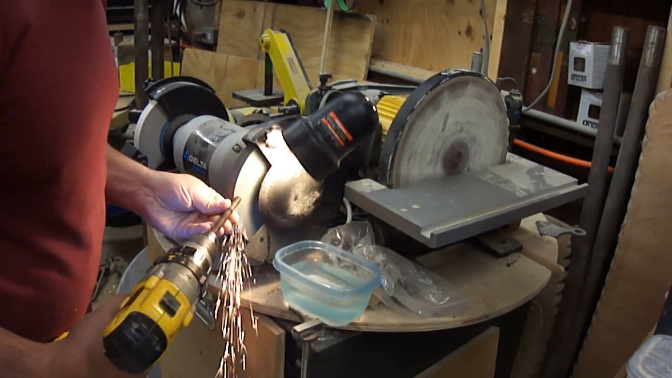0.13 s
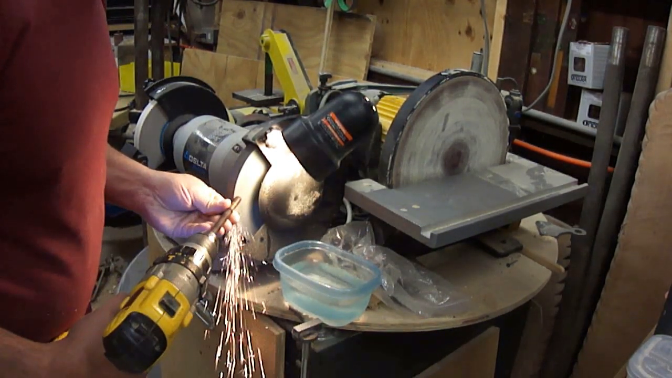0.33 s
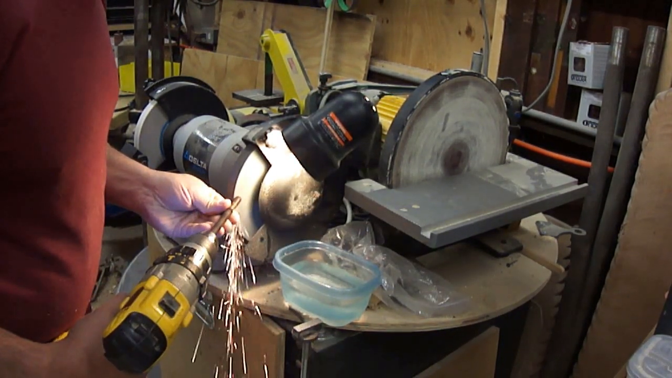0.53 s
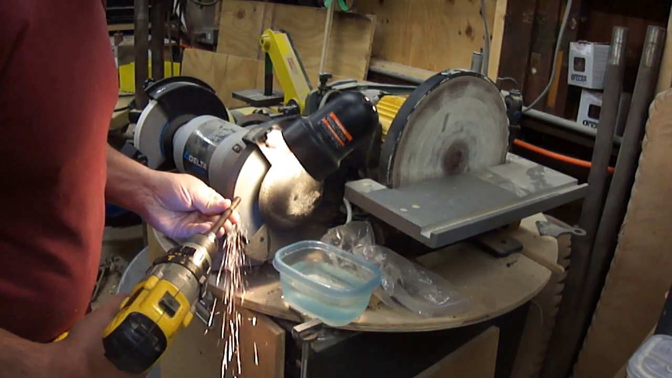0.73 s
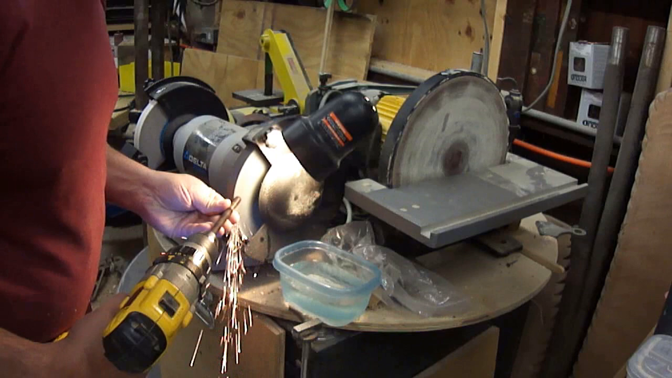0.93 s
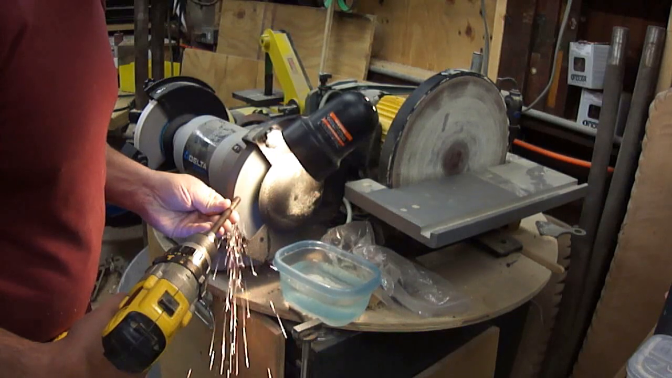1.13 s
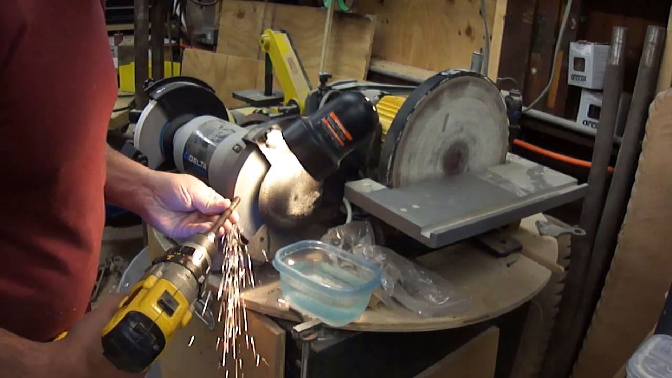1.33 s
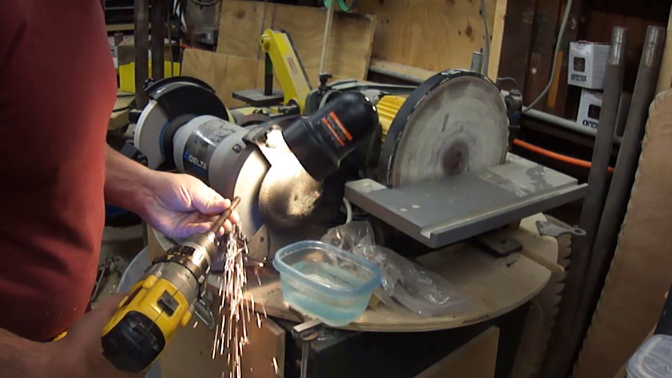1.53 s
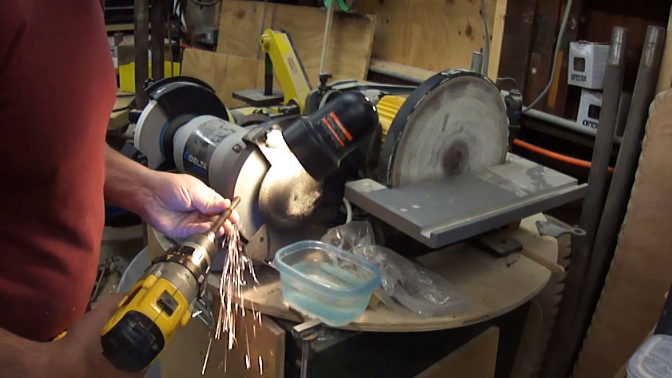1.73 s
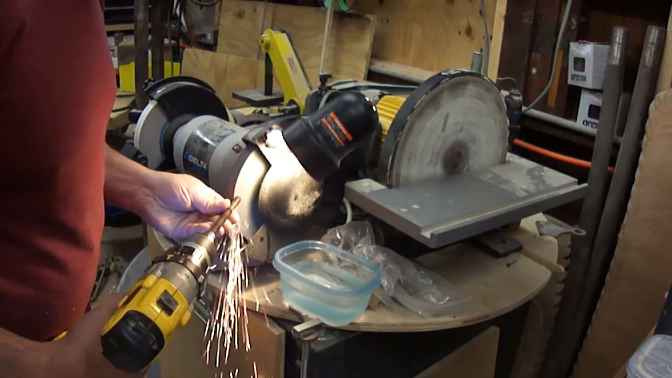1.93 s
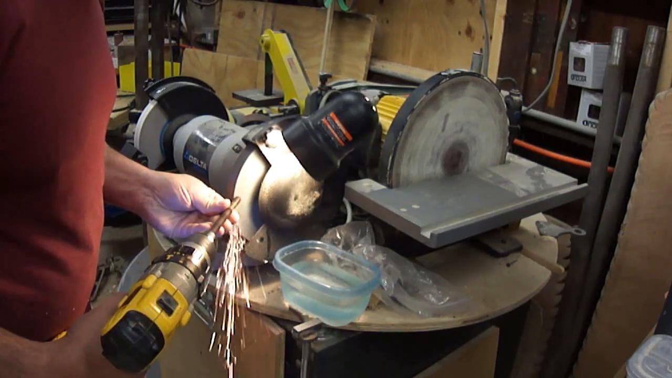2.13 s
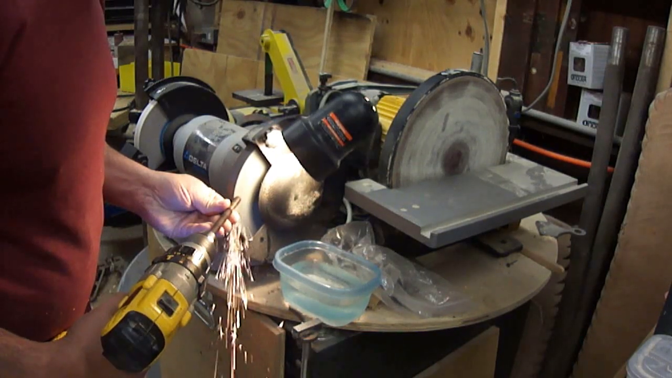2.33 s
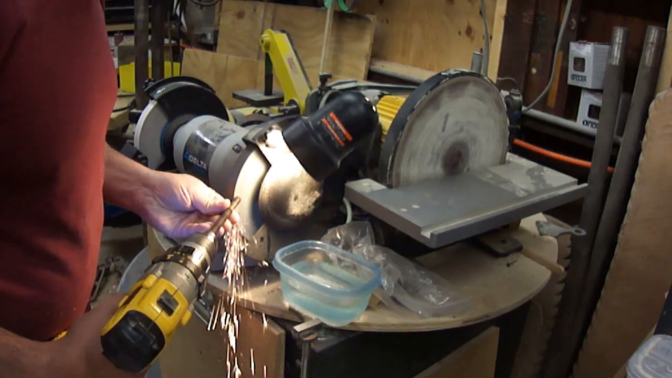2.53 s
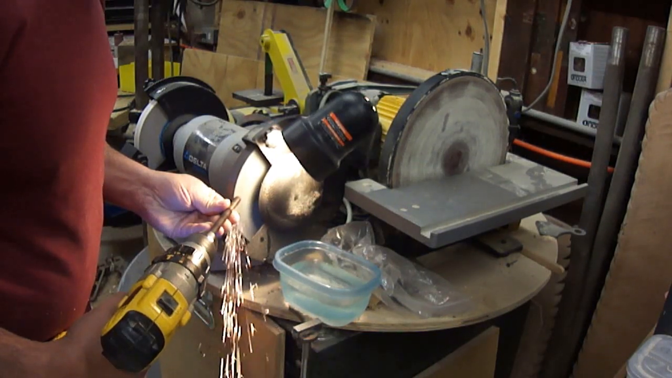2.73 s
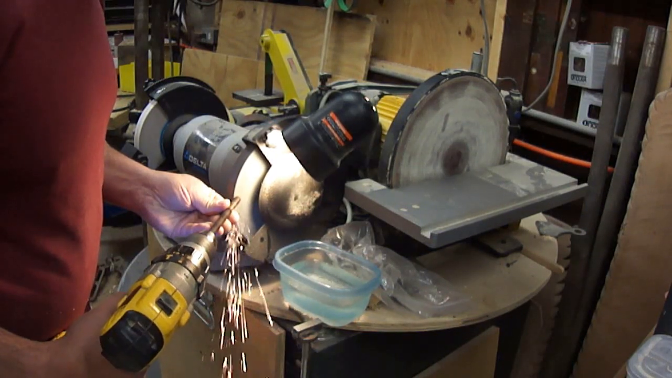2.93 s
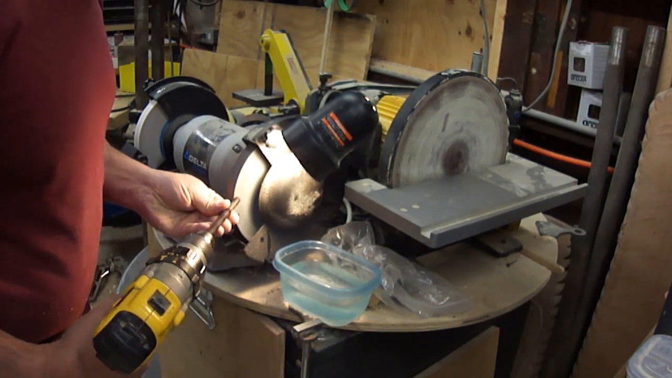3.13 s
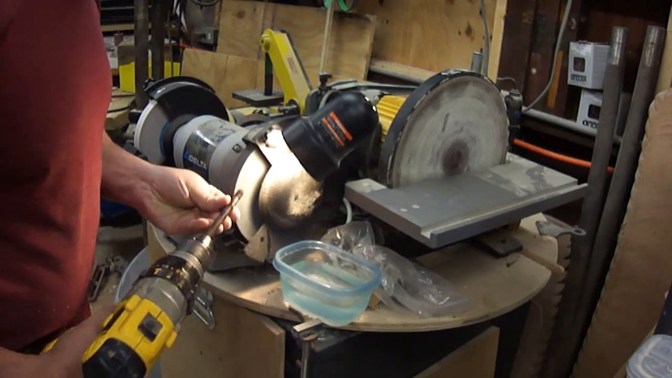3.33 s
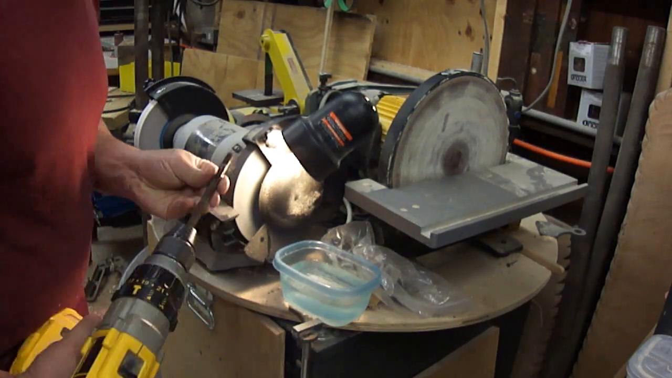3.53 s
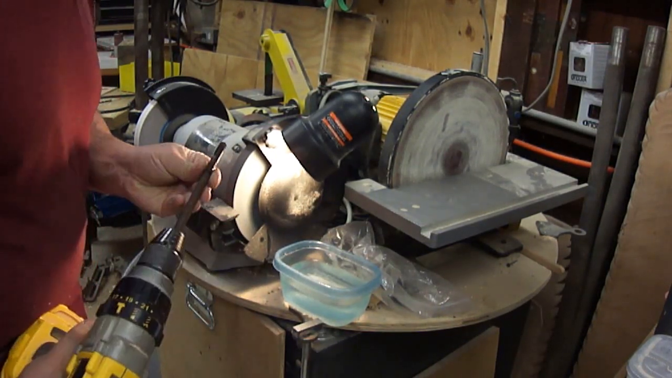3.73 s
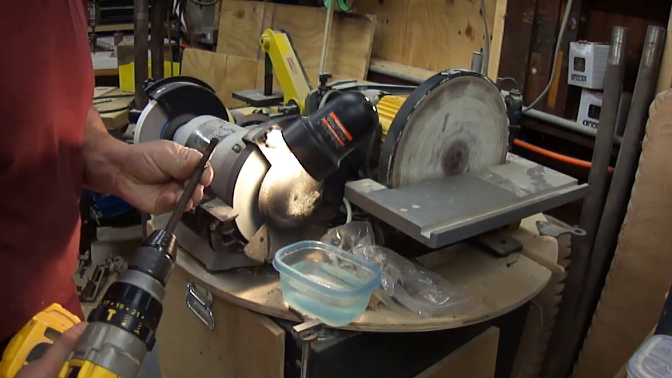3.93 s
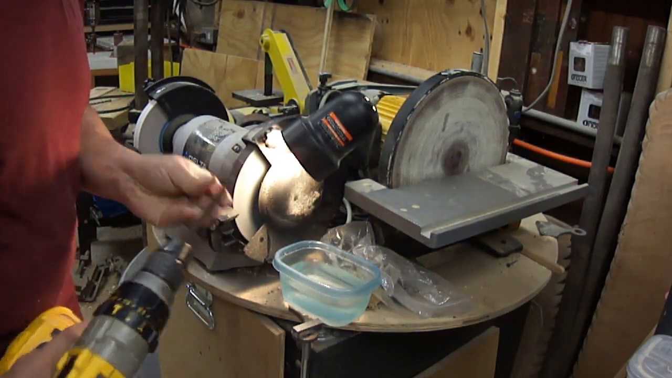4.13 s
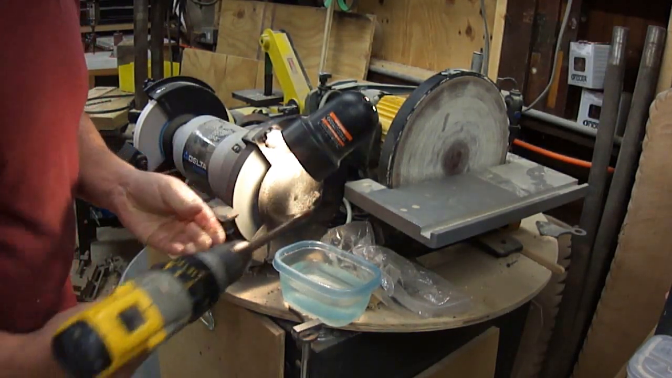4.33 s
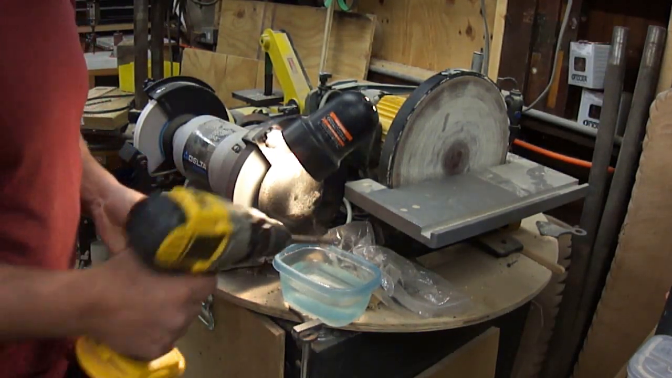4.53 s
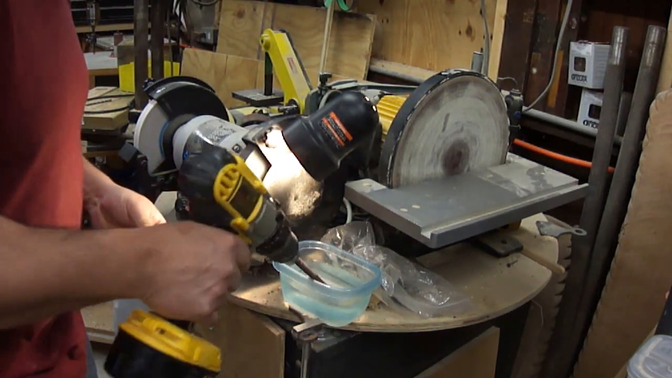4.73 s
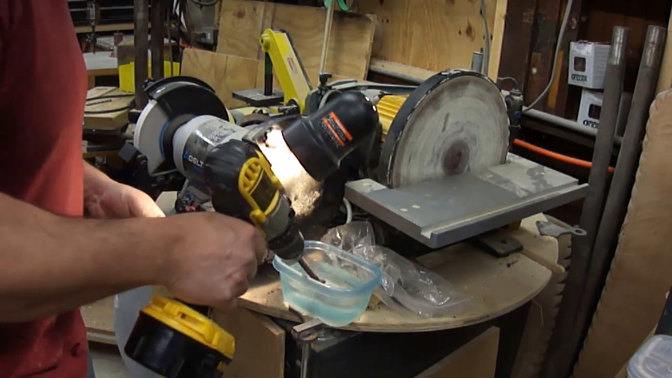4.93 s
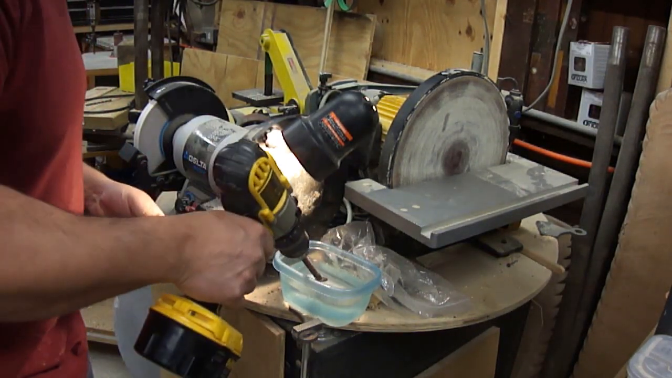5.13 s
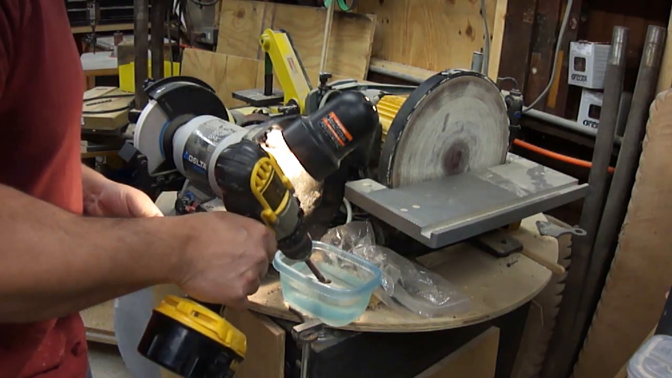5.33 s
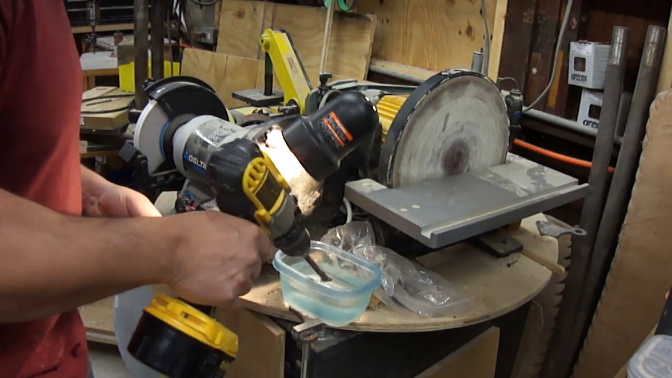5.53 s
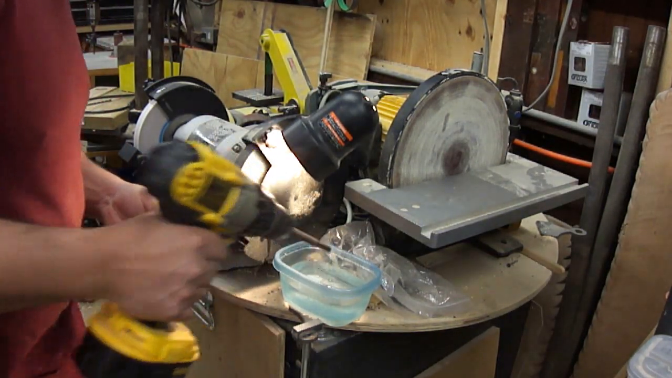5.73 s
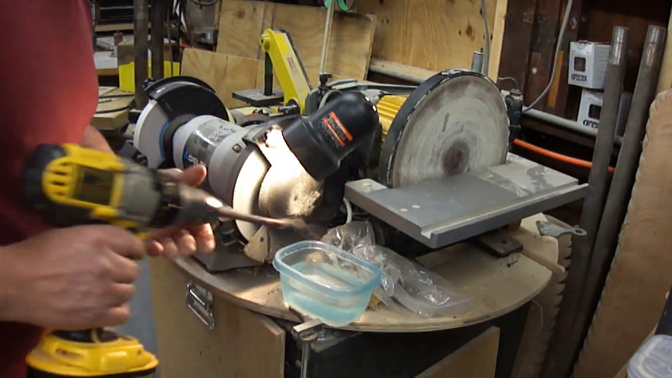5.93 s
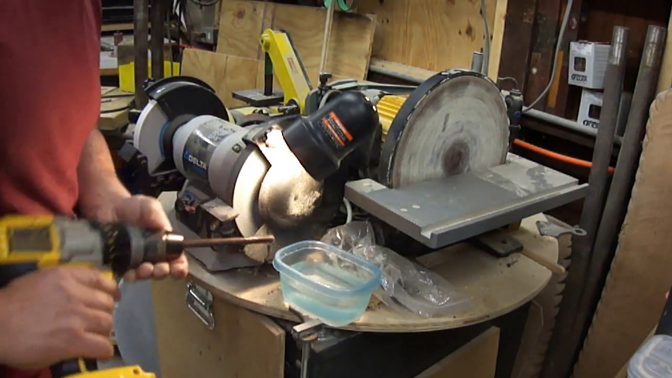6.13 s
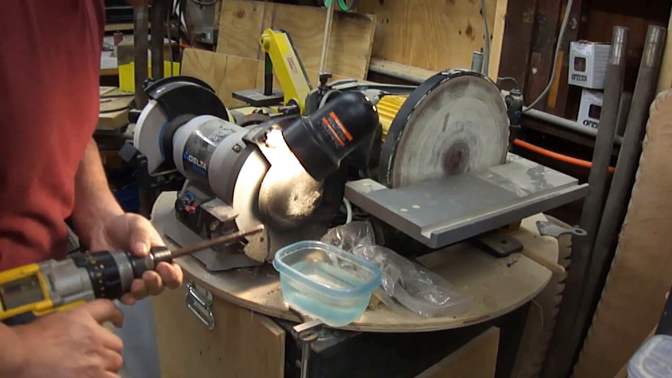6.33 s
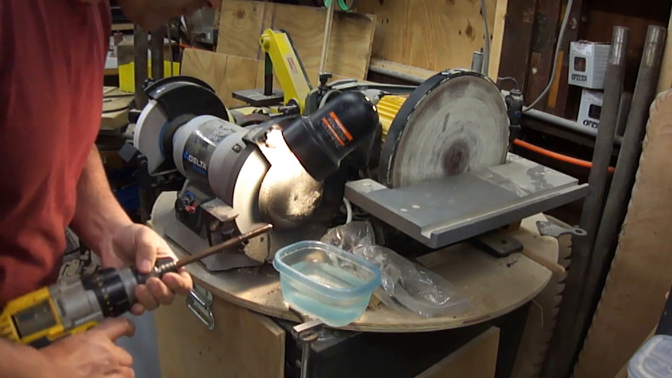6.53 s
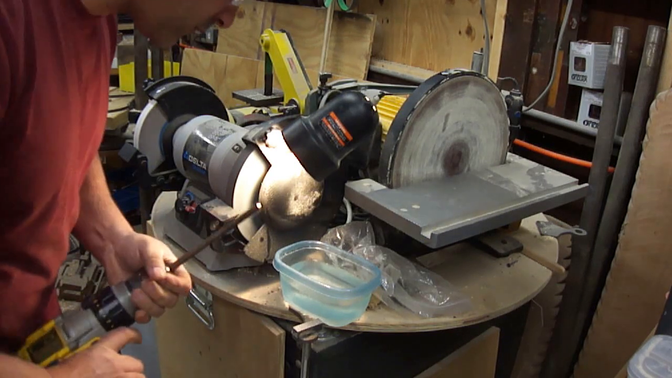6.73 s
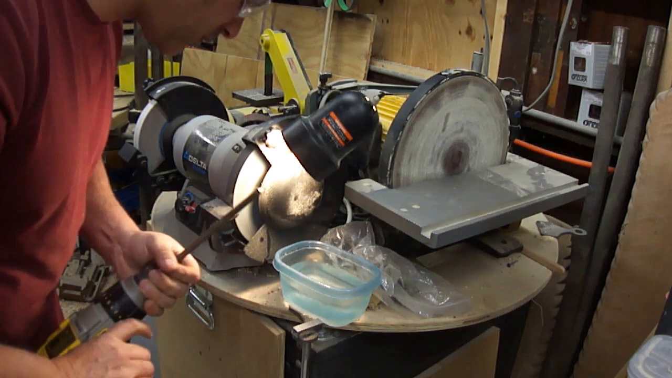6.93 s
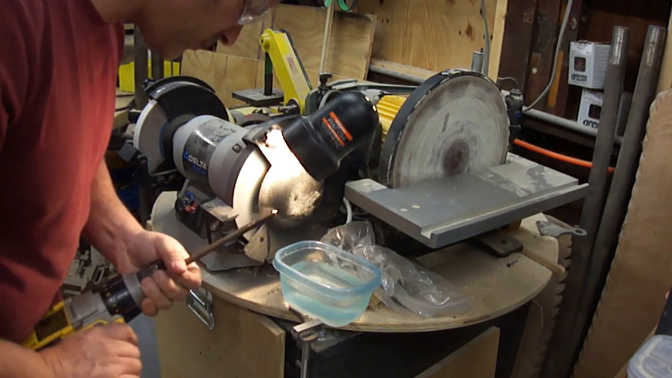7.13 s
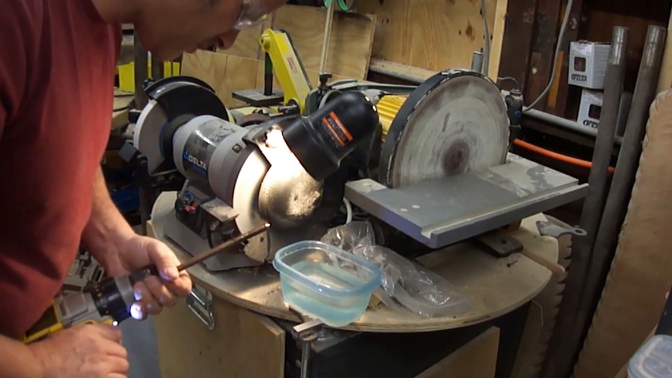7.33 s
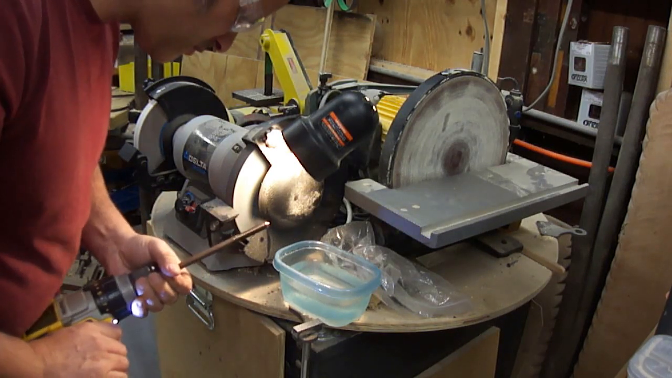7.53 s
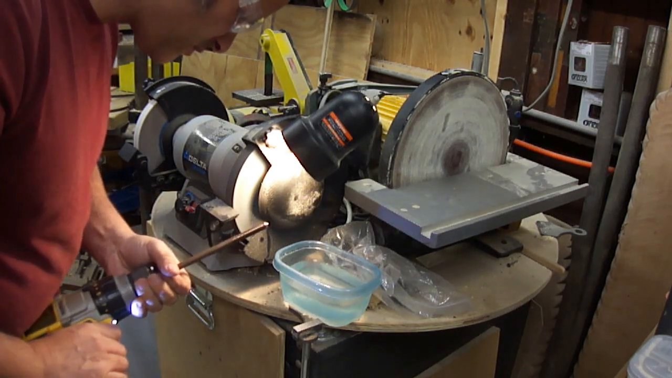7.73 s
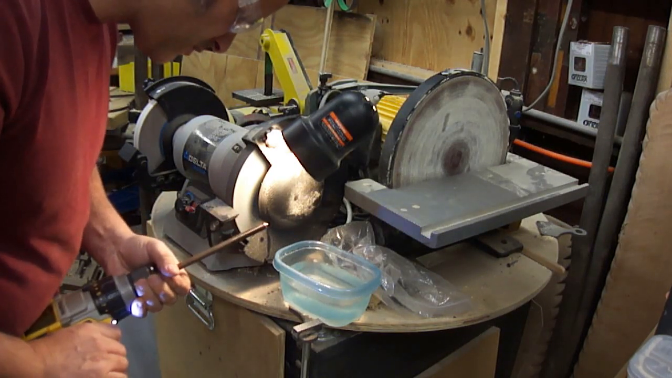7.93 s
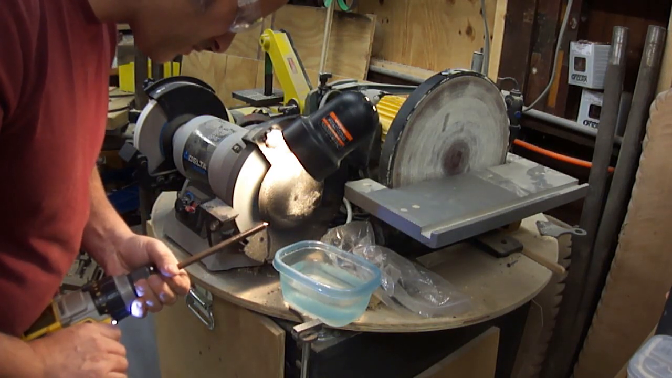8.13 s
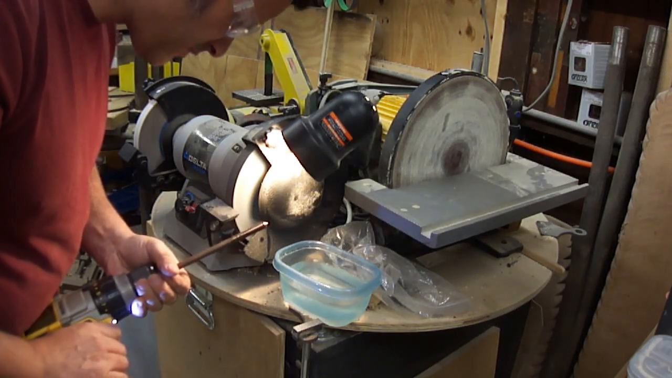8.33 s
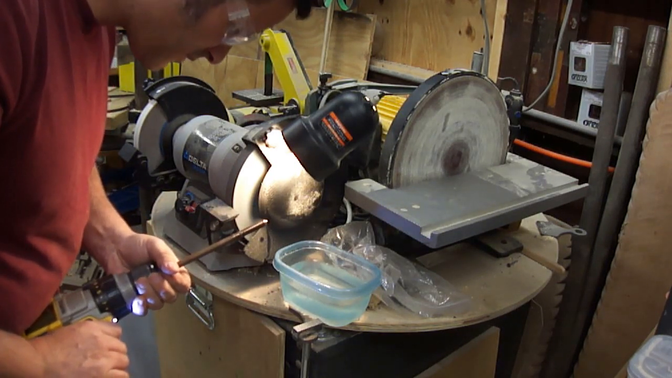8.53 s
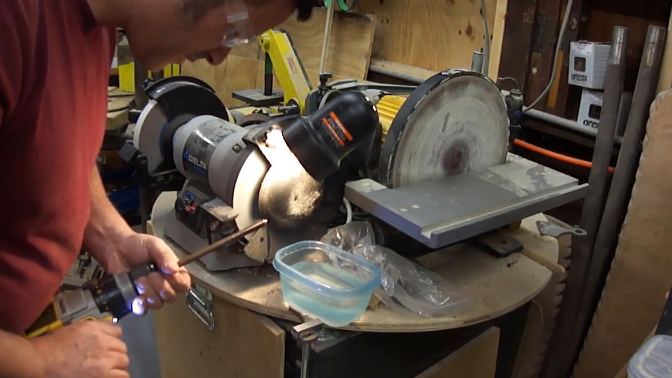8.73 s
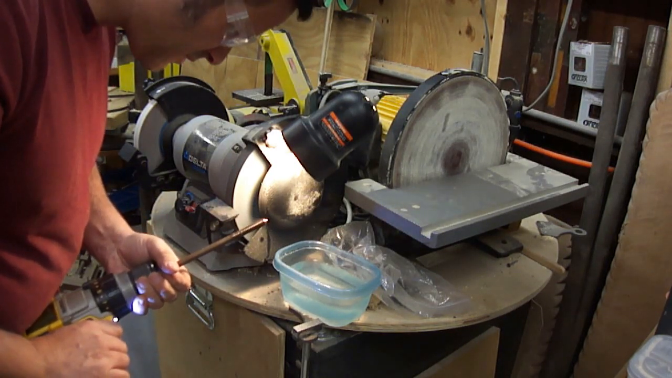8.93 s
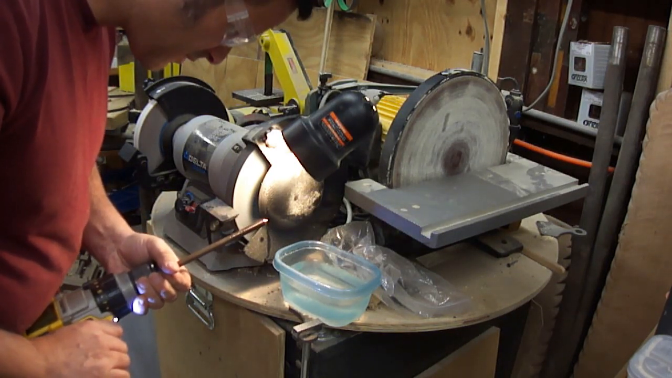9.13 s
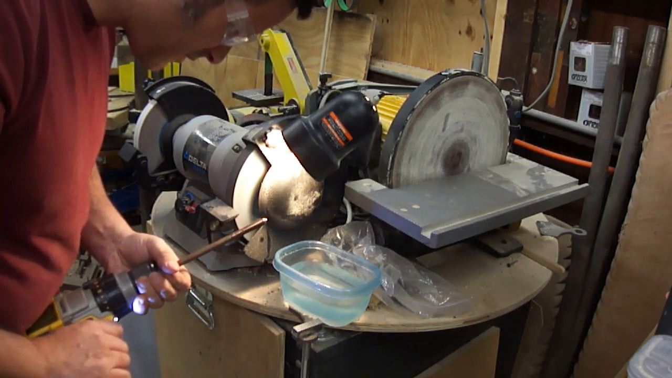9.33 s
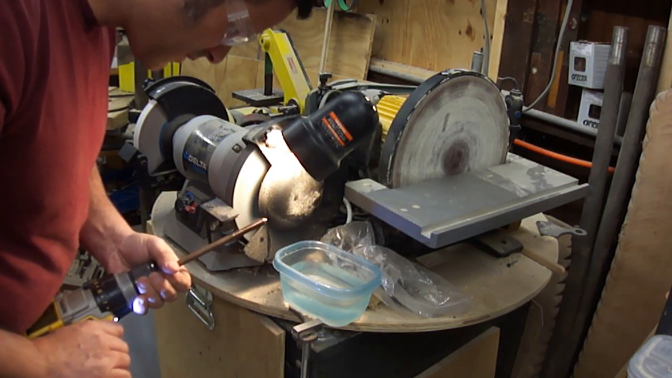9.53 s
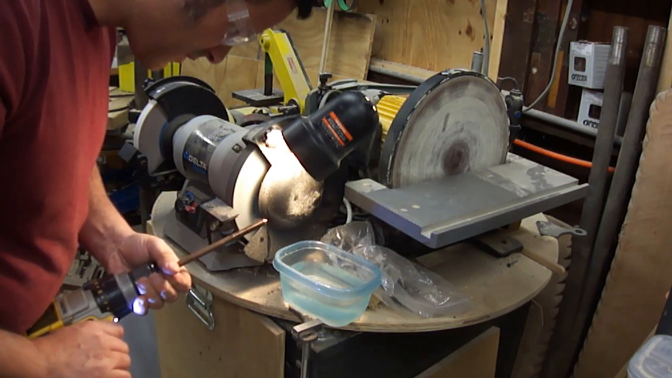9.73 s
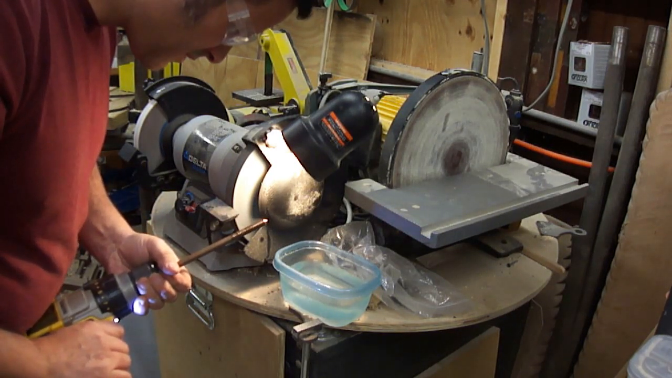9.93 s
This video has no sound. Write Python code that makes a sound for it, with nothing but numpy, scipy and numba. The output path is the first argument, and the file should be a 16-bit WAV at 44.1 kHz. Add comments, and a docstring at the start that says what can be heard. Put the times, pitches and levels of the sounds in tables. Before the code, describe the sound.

A steel rod grinds against a bench grinder wheel with a harsh rasp and a piercing, throbbing squeal over a thin drill whine. After about three seconds it lifts off, leaving the grinder running with rushing air, hum and rattling bearings. Later a cordless drill clicks on, whines up to full speed with a squealing bearing, then starts coasting down. The sound is close, in a small workshop with little echo.

```python
"""A rasp and a piercing squeal: a steel rod, turned slowly by a cordless drill, bites into a bench grinder.
Grit tears at the steel and the squeal throbs with each turn of the wheel. After three seconds the rod
lifts off and the grinder runs free in the small workshop, all rushing air and rattling bearings.
Later the drill clicks on, whines up to full speed with a squealing bearing, and is let go.
An automatic gain control holds the loud parts down and slowly swells in between."""
import sys
import numpy as np
from scipy import signal
from scipy.fft import rfft, irfft, next_fast_len
from scipy.io import wavfile
from scipy.ndimage import uniform_filter1d
from numba import njit

SR = 44100
rng = np.random.default_rng(int(sys.argv[2]) if len(sys.argv) > 2 else 0)


def generate_wav(signal):
    """Clip the signal to [-1, 1] and save it as 16-bit WAV at the path in sys.argv[1]."""
    frames = np.transpose(np.atleast_2d(signal))
    scaled = np.clip(frames, -1, 1) * 32767
    pcm = np.round(scaled).astype(np.int16)
    wavfile.write(sys.argv[1], SR, pcm)


N = 439677
TIME = np.arange(N) / SR
FFT_SIZE = next_fast_len(N + SR // 2)
FREQ = np.maximum(np.arange(FFT_SIZE // 2 + 1) * SR / FFT_SIZE, 1)

# Levels in the tables are relative; each layer gets its place in the mix below.
# grinder shaft, slower under load: time_s, speed_hz
SHAFT_SPEED = [(0, 49.42), (3.14, 49.42), (3.5, 50.8), (4, 50.92), (10, 50.86)]
# the shaft's drone: shaft_multiple, level_db
DRONE_TONES = [(1, -38), (2, -26), (3, -25.5), (4, -17.5), (5, -6), (6, -10.5), (8, -2.5), (10, -2.5),
               (11, -4), (17, 2), (19, -10), (21, -10), (22, -8), (24, -10), (26, -8.5), (27, -5), (44, -7),
               (63, -2), (64, -6)]
# single drone overtones that swell and sink: shaft_multiple, middle_s, half_length_s, lift_db
DRONE_SWELLS = [(19, 5, 1.7, 8), (5, 5.8, .65, 6), (27, 5.9, .17, 7), (8, 7, .8, 5), (44, 7.36, .075, 14)]
# motor hum at multiples of the mains: pitch_hz, level_db
MAINS_HUM = [(480, -46), (600, -32.5)]
# air rushing round the wheels: frequency_hz, level_db
AIR_SPECTRUM = [(30, -44), (80, -38), (160, -26.5), (215, -7.5), (300, -1), (480, 5), (760, 0.5),
                (1150, 1.5), (1600, -5), (2300, 0), (4700, -4.5), (7000, -8.5), (10500, -22.5),
                (15000, -95)]
# rise and fall of that rush: time_s, level_db
AIR_FADER = [(3.1, -3.5), (3.6, -0.7), (5.2, -1), (5.75, 1), (6.2, 0.8), (6.9, -0.8), (9.9, -0.5)]
# boom of the housing and guards: pitch_hz, width_hz, level_db
HOUSING_MODES = [(483, 59, -4.5), (607.5, 22, -2), (870, 41, 1.5), (1045, 48, -12), (1327, 53, -13.5)]
# midrange roar that opens up for a moment: pitch_hz, width_hz, level_db
ROAR_MODES = [(305, 100, -3), (660, 150, -6), (1060, 82, 1), (1290, 100, 1), (1680, 290, -10)]
# metal parts rung by the grinder's bearings: pitch_hz, width_hz, level_db
RATTLE_MODES = [(1985, 70, -10), (2110, 60, -4), (2682, 27, -6), (3050, 50, -7), (3220, 100, 5.5),
                (3372, 55, 5), (3875, 40, -7), (4110, 83, -0.5), (4250, 50, -6), (4490, 60, -10),
                (5230, 160, -9.5), (5800, 45, -6), (6780, 86, -15), (7230, 68, -16)]
# the worker moves about and shields the grinder: time_s, body_db, rattle_db, drone_db
SHIELDING = [(3.5, 4, 2, 2), (4.2, 2.5, 3, 2), (5.1, 1.2, 2, 1), (5.9, -1, -2, .5), (6.6, -2, -1, -1.5),
             (7.3, -1.5, 2.8, -1), (8.2, -1, 0.5, -0.5), (9.2, -1.5, 0.5, -1.5), (9.9, -1.5, 0, -.5)]
# the drill's fan tone: fan_multiple, level_db
FAN_TONES = [(1, -0.5), (2, -17.5)]
# how strongly the fan tone carries at each pitch: pitch_hz, level_db
FAN_RESONANCE = [(400, -62), (640, -35), (770, -22.5), (830, -20.5), (865, -14.5), (900, -10.5),
                 (945, -18.5), (1000, -19), (1020, -20), (1037, -15.5), (1045, -13.5), (1047, -12.5)]
# gearbox whirr: frequency_hz, level_db
WHIRR_SPECTRUM = [(150, -41), (400, -9), (800, -1.5), (1300, -2), (1700, -1.5), (2400, 3.5), (3100, -6.5),
                  (3700, 4.5), (4300, 3), (4900, -0.5), (5900, 0), (7500, -11.5), (10500, -11.5),
                  (15000, -93)]
# whine of meshing teeth: fan_multiple, level_db
MESH_TONES = [(3, -23), (5, -25), (6, -21), (7, -18.5), (8, -23), (9, -27), (10, -29)]
# the drill's bearing squeals: start_s, length_s, pitch_hz, scoop_hz, sag_hz, level_db, jitter_share
BEARING_BURSTS = [(7.53, .105, 4720, 200, 180, -21, .004), (7.78, 0.065, 4160, 60, 20, -17, 0.012),
                  (7.85, 0.23, 4450, 368, 50, -21, 0.002), (8.15, 0.41, 4290, -70, 0, -23.5, .0022),
                  (8.583, 0.6, 4395, 20, 20, -25, 0.003)]
# the rod's last catch on the wheel, then the drill switch's snap, rattle and seating:
# start_s, peak_db, centre_hz, width_hz, decay_s
KNOCKS = [(3.1413, 16, 4600, 4500, .0012), (3.145, 3, 3800, 3000, .012), (7.4324, 3, 3400, 2200, .0007),
          (7.4334, -8, 7000, 9000, .002), (7.439, -7, 3800, 1200, .003)]
# the drill's speed controller sings at part trigger: pitch_hz, level_db
CONTROLLER_TONES = [(1946, -19.5), (3892, -21), (7784, -23.5)]
# grit tearing at steel: frequency_hz, level_db
RASP_SPECTRUM = [(30, -66), (100, -44), (250, -17.5), (400, -9.5), (560, 2), (850, -9), (1150, 1.5),
                 (1600, -2), (2400, 4.5), (3200, 0.5), (4500, 1.5), (5400, -1.5), (6700, -1), (7500, -6.5),
                 (8600, -6.5), (10500, -10), (15000, -7.5)]
# the uneven wheel shakes the rod: shaft_multiple, level_db
CHATTER_TONES = [(1, -52), (2, -31), (3, -29.5), (8, -8.5), (10, 0), (11, -6), (12, -1.5), (13, -6),
                 (23, -6), (29, -4.5), (36, -5.5), (44, -4)]
# loose ringing of the rod, struck by grit: pitch_hz, width_hz, level_db
STRUCK_MODES = [(2775, 45, -9), (5630, 44, 2), (5800, 40, -12), (9210, 65, -8), (9540, 120, -7.5)]
# four rod squeals locked to the wheel (two lone tones, the main tone with sidebands, a high pair),
# one list each: shaft_multiple, level_db
ROD_SQUEAL_TONES = [
    [(55, 0)],
    [(59, 0)],
    [(112, -17), (113, -10), (114, 0), (115, -11), (116, -16), (118, -7.5)],
    [(186, 0), (193, -10)],
]
# roughness of each rod squeal: throb_db, flutter_db, skate_turns
ROD_SQUEAL_ROUGHNESS = [(2, 1.5, .0007), (1, 1, .0005), (.5, 1.5, .0005), (2, 2, .0005)]
# their balance as the rod's bite shifts: time_s, lowest_db, second_db, main_db, high_pair_db
ROD_SQUEAL_FADERS = [(0, -15.5, -10, -8, -19), (.12, -17.5, -17, -10, -18), (.24, -8, -12, -4.5, -22),
                     (.42, -16, -15, -2.5, -23), (.64, -15.5, -16, -1.5, -14),
                     (.85, -15, -16.5, -4.5, -12.5), (1.3, -15, -18, -5.5, -15),
                     (1.7, -11, -9.5, -9, -13.5), (1.85, -12, -10.5, -5, -15), (2, -13.5, -13.5, -9, -17),
                     (2.15, -17.5, -9.5, -4, -16), (2.5, -12, -7.5, -2.5, -20), (2.8, -14, -9, -5.5, -19),
                     (3, -15, -15, -7, -18)]

EASE_OFF_S, LIFT_OFF_S = 3.1, 3.14  # the hand lets up, then the rod leaves the wheel
TRIGGER_S, LET_GO_S = 7.435, 9.24  # the drill's free run


def undb(db):
    """Decibels to gain."""
    return 10 ** (np.asarray(db) / 20)


def unit(x):
    """Scale to rms 1."""
    return x / np.sqrt(np.mean(x ** 2))


def curves(table):
    """Each column of a timed table as a sample-by-sample curve."""
    times, *columns = np.transpose(table)
    return [np.interp(TIME, times, column) for column in columns]


def since(start_s):
    """Seconds gone by since a moment, zero before it."""
    return np.maximum(TIME - start_s, 0)


def fade(end_s, decay_s):
    """Full level until a moment, then dying away."""
    return np.exp(-since(end_s) / decay_s)


def swell(middle_s, half_s):
    """A smooth, flat-topped swell from 0 to 1 and back."""
    return np.exp(-((TIME - middle_s) / half_s) ** 4)


def noise():
    """White noise."""
    return rng.standard_normal(N)


def wander(rate_hz):
    """Smooth random drift with a spread near 1."""
    hold = max(int(SR / rate_hz), 1)
    return 1.19 * uniform_filter1d(np.repeat(noise()[:N // hold + 1], hold), hold)[:N]


def colour(x, spectrum):
    """Equalise a sound along a spectrum, at rms 1."""
    hz, db = np.transpose(spectrum)
    response = undb(np.interp(np.log(FREQ), np.log(hz), db))
    return unit(irfft(rfft(x, FFT_SIZE) * response, FFT_SIZE)[:N])


def resonate(x, modes, bass_hz=210):
    """Ring a set of resonances, at rms 1; small parts radiate little bass."""
    response = sum(undb(db) / (1 + 1j * (FREQ ** 2 - hz ** 2) / (FREQ * width))
                   for hz, width, db in modes)
    response /= 1 + (bass_hz / FREQ) ** 4
    return unit(irfft(rfft(x, FFT_SIZE) * response, FFT_SIZE)[:N])


def partials(turns, tones, waver_db, rate_hz, scatter=1):
    """Wavering sines at multiples of a phase; with little phase scatter they throb once a turn."""
    out = 0
    for multiple, db in tones:
        level = np.sqrt(2) * undb(db + waver_db * wander(rate_hz))
        out += level * np.cos(2 * np.pi * (round(multiple) * turns + scatter * rng.random()))
    return out


def surface(turns, harmonics):
    """A random profile round a wheel that comes back on every turn."""
    profile = unit(irfft(np.r_[0, np.exp(2j * np.pi * rng.random(harmonics))], 2 ** 13))
    return profile[(turns % 1 * len(profile)).astype(int)]


def scrape(turns, repeat):
    """Rolling or rubbing force: one share repeats with the turn, the rest is always new."""
    return np.sqrt(repeat) * surface(turns, harmonics=300) + np.sqrt(1 - repeat) * noise()


@njit
def gain_reduction(over_db, attack, release):
    """The cut in dB: it closes in on any excess and lets go at a steady rate."""
    cut, out = max(over_db[:2000].max(), 0.), np.empty(len(over_db))
    for i in range(len(over_db)):
        if over_db[i] > cut:
            cut += attack * (over_db[i] - cut)
        else:
            cut = max(cut - release, 0.)
        out[i] = cut
    return out


def gain_control(x, top_db, window_s, attack_s, release_db_per_s):
    """Turn the sound down when its recent power passes a ceiling."""
    pole = np.exp(-1 / (window_s * SR))
    power = signal.lfilter([1 - pole], [1, -pole], x ** 2) + 1e-12
    over_db = 10 * np.log10(power) - top_db
    return x * undb(-gain_reduction(over_db, 1 / (attack_s * SR), release_db_per_s / SR))


def workshop(x, reverb_s=.3, wet_db=-16):
    """A cluttered wooden room adds a short, faint, diffuse tail."""
    t = TIME[:SR // 2]
    tail = noise()[:len(t)] * np.exp(-np.log(1000) * t / reverb_s) * (t > .004)
    return x + undb(wet_db) * signal.fftconvolve(x, tail / np.linalg.norm(tail))[:N]


def shaft_drone(turns):
    """The spinning shaft's overtones, a few of which swell for a while."""
    tones = []
    for multiple, db in DRONE_TONES:
        lift_db = sum(lift * swell(middle_s, half_s)
                      for swelling, middle_s, half_s, lift in DRONE_SWELLS if swelling == multiple)
        tones.append((multiple, db + lift_db))
    return partials(turns + .002 * wander(12), tones, waver_db=1.5, rate_hz=14)


def grinder(turns):
    """The bed: bearings rattle, the housing booms, air rushes round the wheels, motor and shaft drone."""
    body_db, rattle_db, drone_db = curves(SHIELDING)
    rest = np.exp(-((turns % 1 - .5) / .2) ** 2)  # the rattle pauses once a turn
    pulse_db = -9.5 * rest + surface(turns, harmonics=9) + .6 * wander(30)
    rolling = scrape(turns + .002 * wander(14), repeat=.45)
    rattle = resonate(rolling * undb(pulse_db), RATTLE_MODES)
    boom = resonate(noise() * undb(.5 * pulse_db), HOUSING_MODES)
    roar = resonate(scrape(turns, repeat=.2), ROAR_MODES) * swell(middle_s=5.87, half_s=.44)
    air = colour(scrape(turns, repeat=.11) * undb(.32 * pulse_db), AIR_SPECTRUM)
    # the hum is shielded twice as deeply as the rest of the body
    hum = partials(TIME, MAINS_HUM, waver_db=2, rate_hz=17) * undb(body_db)
    body = undb(-20.5 + curves(AIR_FADER)[0]) * air + undb(-27.5) * boom + undb(-28.5) * roar + hum
    load = fade(EASE_OFF_S, .047)  # every layer sits lower while the rod presses
    return (body * undb(.5 - 5 * load + body_db)
            + rattle * undb(-22.5 - 3.5 * load + rattle_db)
            + shaft_drone(turns) * undb(-33 - 6 * load + drone_db))


def clicks():
    """Short, hard knocks on steel and plastic: the rod's last catch and the drill's switch."""
    out = 0
    for start_s, peak_db, hz, width_hz, decay_s in KNOCKS:
        mode = [(hz, width_hz, 0)]
        strike = noise() * (TIME >= start_s) * fade(start_s, decay_s)
        knock = resonate(resonate(strike, mode), mode)
        out += undb(peak_db) * knock / np.abs(knock).max()
    return out


def drill(full_speed_hz=1045, spin_up_s=.48, coast_s=.68):
    """The motor spins up and coasts down; its speed drives the fan tone and the gears' whirr and whine."""
    speed = np.maximum(np.tanh(since(TRIGGER_S) / spin_up_s) * fade(LET_GO_S, coast_s), 1e-6)
    fan_hz = full_speed_hz * speed
    cycles = np.cumsum(fan_hz * (1 + .00088 * wander(60))) / SR
    fan_db = np.interp(fan_hz, *np.transpose(FAN_RESONANCE))
    fan = partials(cycles, FAN_TONES, waver_db=1.76, rate_hz=50)
    whirr_db = -17 + 7 * np.log2(speed) + since(TRIGGER_S)  # grows with speed; a slow rise with time offsets the gain control
    whirr = colour(noise() * undb(.92 * wander(500)), WHIRR_SPECTRUM)
    slack = .005 * wander(130)  # play between the teeth smears the mesh tones
    mesh = partials(cycles + slack, MESH_TONES, waver_db=4, rate_hz=40)
    onset = 1 - fade(TRIGGER_S, .02)
    return onset * (undb(fan_db) * fan + undb(whirr_db) * whirr + undb(-17.5) * speed * mesh)


def drill_bearing(edge_s=.0095):
    """The dry bearing catches in bursts: a rough whistle that scoops to its pitch and mostly sags away."""
    out, jitter, flutter = 0, wander(200), undb(1.5 * wander(50))
    for start_s, length_s, hz, scoop_hz, sag_hz, db, jitter_share in BEARING_BURSTS:
        end_s, slide_s = start_s + length_s, .27 * length_s
        scoop = scoop_hz * fade(start_s, slide_s)
        sag = sag_hz * np.exp(-np.maximum(end_s - TIME, 0) / slide_s)
        pitch_hz = (hz - scoop - sag) * (1 + jitter_share * jitter)
        envelope = (1 - fade(start_s, edge_s)) * fade(end_s, edge_s)
        out += undb(db) * envelope * np.sin(2 * np.pi * np.cumsum(pitch_hz) / SR)
    return out * flutter


def rod_squeals(turns):
    """Self-fed squeals throb with each turn; the rod hops and skates, roughening level and pitch."""
    out = 0
    voices = zip(ROD_SQUEAL_TONES, ROD_SQUEAL_ROUGHNESS, curves(ROD_SQUEAL_FADERS))
    for tones, (throb_db, flutter_db, skate_turns), level_db in voices:
        squeal = partials(turns + skate_turns * wander(60), tones, waver_db=1, rate_hz=30)
        roughness_db = throb_db * np.cos(2 * np.pi * turns) + flutter_db * wander(70)
        out += undb(level_db) * unit(squeal * undb(roughness_db))
    return out


def rod_on_wheel(turns):
    """Grit tears at the steel: rasp, squeal, ringing and low chatter, over the slow drill's whine."""
    grit = undb(2 * wander(2500) + .26 * wander(45.5) + .28 * surface(turns, harmonics=8))
    rasp = colour(scrape(turns, repeat=.1) * grit, RASP_SPECTRUM)
    squeals = rod_squeals(turns)
    ringing = resonate(noise() * grit, STRUCK_MODES)
    chatter = partials(turns, CHATTER_TONES, waver_db=2, rate_hz=16, scatter=.062)
    whine = partials(TIME + .00004 * wander(18), CONTROLLER_TONES, waver_db=1.5, rate_hz=28)
    # these three need firm pressure, so they die just before the rod leaves the stone
    pressure = fade(EASE_OFF_S, .026)
    pressed = pressure * (squeals + undb(-10.5) * ringing + undb(-21) * chatter)
    rasp_gain = undb(-3.5 - 2 * (1 - pressure)) * fade(LIFT_OFF_S, .031)
    unsteady_hand = undb(-.03 * wander(7.06))
    return unsteady_hand * (rasp_gain * rasp + pressed) + whine * fade(EASE_OFF_S, .058)


def scene():
    """Grinder, rod and drill in the workshop; grinder and rod follow the same turning shaft."""
    turns = np.cumsum(curves(SHAFT_SPEED)[0]) / SR
    return workshop(grinder(turns) + rod_on_wheel(turns) + drill() + drill_bearing() + clicks())[None]


def record(dry):
    """Slow gain control, a quick limiter, rounded peaks, one brief dropout and a darkened top end."""
    emphasis, ceiling = [1, -.45], .74
    dropout_start_s, dropout_end_s = .1905, .195
    treble_rolloff_hz, top_cut_hz = 11400, 15200
    bright = signal.lfilter(emphasis, 1, dry[0])  # makes both gain stages keener on treble
    levelled = gain_control(bright, top_db=-21, window_s=.011, attack_s=.16, release_db_per_s=6)
    limited = gain_control(levelled, top_db=-16.5, window_s=.00021, attack_s=.0012, release_db_per_s=50)
    flat = signal.lfilter([1], emphasis, limited)
    rounded = flat / (1 + (flat / ceiling) ** 8) ** (1 / 8)
    gate = uniform_filter1d(1. * ((TIME < dropout_start_s) | (TIME > dropout_end_s)), size=44)
    darkened = signal.sosfilt(signal.butter(12, treble_rolloff_hz, fs=SR, output="sos"), rounded * gate)
    return signal.sosfilt(signal.ellip(8, .2, 70, top_cut_hz, fs=SR, output="sos"), darkened)[None]


dry = scene()
out = record(dry)
generate_wav(out)
```